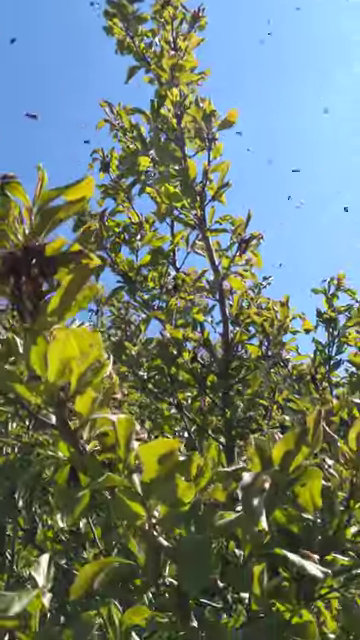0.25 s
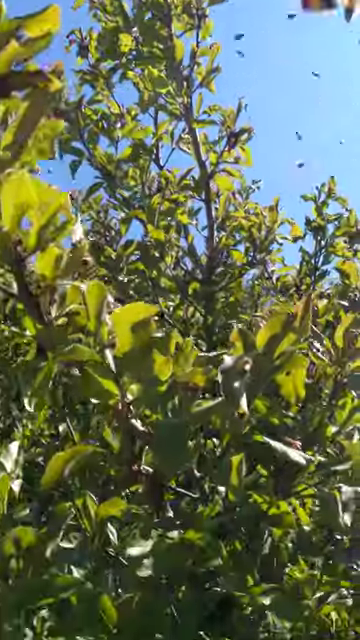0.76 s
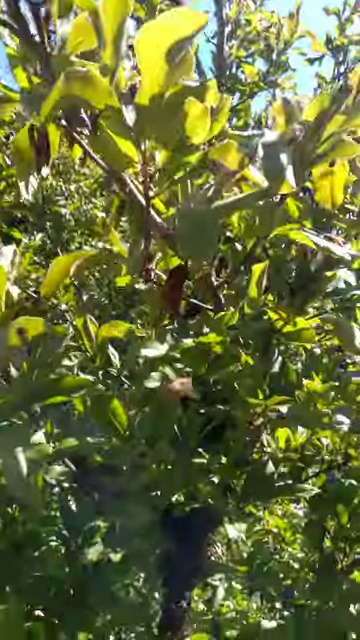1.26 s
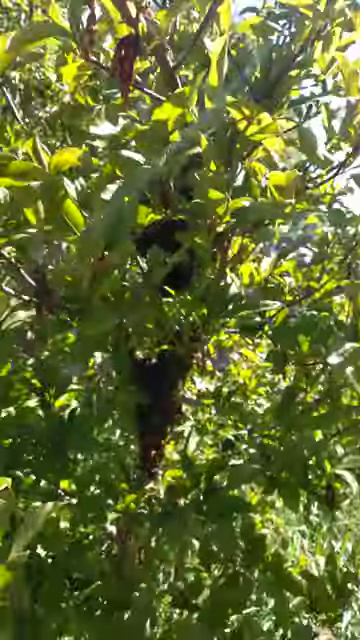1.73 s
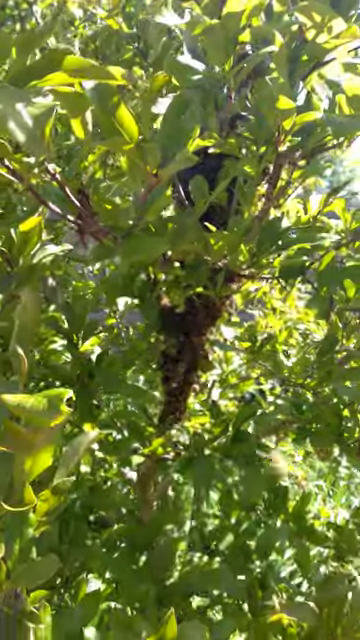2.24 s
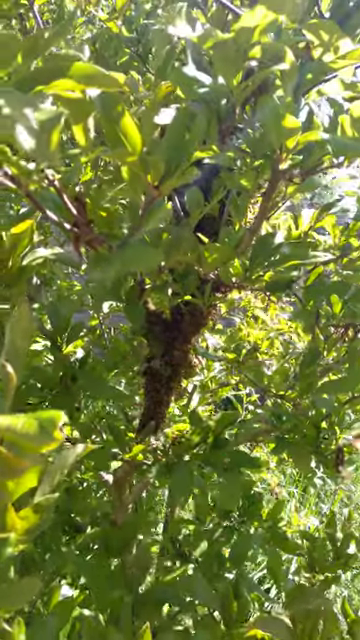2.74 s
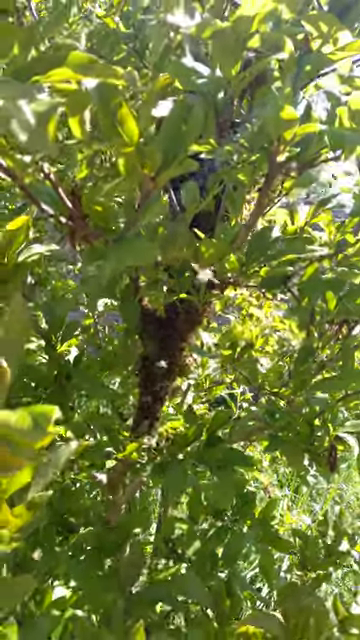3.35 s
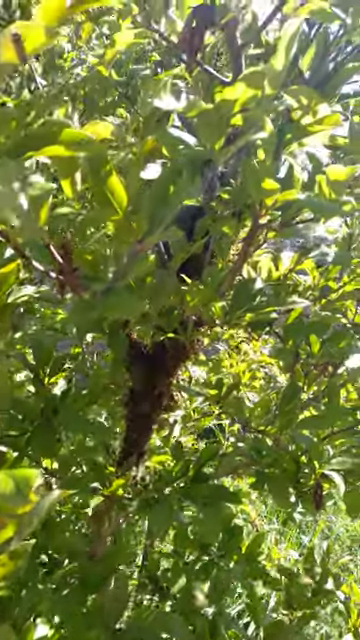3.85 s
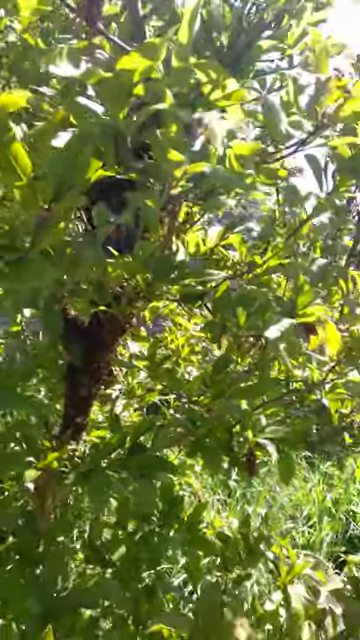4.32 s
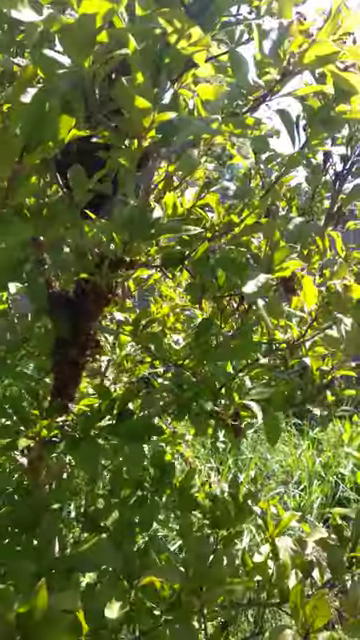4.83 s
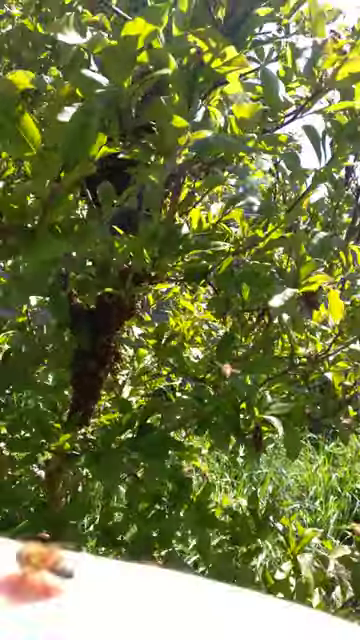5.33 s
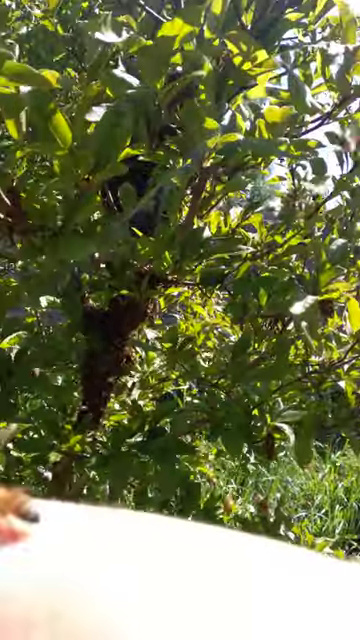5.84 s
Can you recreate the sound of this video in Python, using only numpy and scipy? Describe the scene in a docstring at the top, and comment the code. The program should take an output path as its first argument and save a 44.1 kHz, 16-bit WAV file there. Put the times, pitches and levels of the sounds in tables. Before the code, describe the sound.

Outdoors by a fruit tree, a honeybee swarm makes a continuous wavering hum near 250 hertz. Single bees dart close past the two microphones of a hand-held phone, each a very short swelling buzz that drops in pitch, on either side. Low puffs of air thump on the right, strongest just before one second, and a dull hand knock comes midway. Faint hiss and soft open air lie beneath.

```python
"""A wavering hum runs throughout: a swarm of honeybees circles a fruit tree, heard on a hand-held phone.
Dozens of wavering wingbeats merge into the hum; single bees dart close past the two microphones
with a dropping pitch, and others hover nearby with a bright buzz. Puffs of air (low noise) and
a hand knock (ringing case) thump on the right port, over outdoor air and a soft hiss."""
import sys
import numpy as np
from scipy import signal
from scipy.fft import rfft, irfft, next_fast_len
from scipy.io import wavfile

SR = 44100
rng = np.random.default_rng(int(sys.argv[2]) if len(sys.argv) > 2 else 0)


def store_pcm(level_fs):
    """Save levels as 16-bit WAV."""
    pcm = np.round(np.clip(level_fs, -1, 1) * 32767).astype(np.int16)
    wavfile.write(sys.argv[1], SR, np.atleast_2d(pcm).T)


N = 267951
TIME = np.arange(N) / SR  # seconds
WINGBEAT_HZ, SWARM_DB = 252.93, -61  # middle wingbeat; loudness of the hum (rms)

# The tones inside one wingbeat, also used by the close passes: multiple of the wingbeat, level_db
WINGBEAT_TONES = [(1, 2), (2, -1.5), (3, -9.5), (4, -5.5), (5, -8.5), (6, -11), (7, -12.5), (8, -24.5),
                  (9, -22), (10, -21)]


def swarm(count=48, spread=.058, slow_skew=.016, waver=.038, jitter=.019,
          swell_db=3.0, side_db=3.0, right_dull_db=-2.5):
    """Each bee has its own wingbeat, wavers as it steers, and swells, fades and changes side as it circles."""
    multiple, level_db = np.transpose(WINGBEAT_TONES)
    multiple = np.round(multiple)
    cycle = np.arange(1024) / 1024
    # the right microphone hears the tones above the third more weakly
    ear_db = level_db + np.outer([0, right_dull_db], multiple > 3)
    rank = (np.arange(count) + .5) / count
    vigour = np.log(rank / (1 - rank)) * np.sqrt(3) / np.pi  # a bell-shaped spread over the bees
    out = np.zeros((2, N))
    for v in vigour:
        # laden bees trail off to lower pitches
        own_pitch = spread * v - slow_skew * v * v
        steering = waver * drift(2.5) + jitter * drift(29.62)
        pitch_hz = WINGBEAT_HZ * np.exp(own_pitch + steering)
        beats = np.cumsum(pitch_hz) / SR
        place = (beats % 1 * len(cycle)).astype(int) % len(cycle)
        near_db, lean_db = swell_db * drift(5.2), side_db * drift(3.1)
        for ear, sign in enumerate((1, -1)):
            # scattering by the leaves gives each tone its own phase at each microphone
            turns = np.outer(multiple, cycle) + rng.random((len(multiple), 1))
            stroke = from_db(ear_db[ear]) @ np.sin(2 * np.pi * turns)
            out[ear] += stroke[place] * from_db(near_db + sign * lean_db)
    return from_db(SWARM_DB) * rms_one(out)


# The closest passes: nearest_s, pitch_hz (wingbeat), level_db, left_minus_right_db,
# octave_over_fundamental_db, length_s (a smaller length is a quicker pass)
CLOSEST_PASSES = [ (.272, 244, -50.5, 2, -17, 0.0099), (0.637, 250, -52.5, -16, 20, 0.0093),
                  (.660, 250.2, -55.5, 14, 21, 0.013), (0.933, 242.3, -44.5, -1.5, -17, 0.021),
                  (1.126, 248.7, -48, 1, -20, 0.012), (1.507, 245, -47.5, 2, -15, .012),
                  (2.249, 254, -47.5, -1.5, -8, 0.011), (2.364, 255, -53.5, 7, -25, 0.019),
                  (2.434, 259, -52, -19.5, 14, .011), (2.47, 245.6, -53.5, 20, -7, 0.015),
                  (2.543, 243.4, -44, 4, -27, 0.0088), (2.731, 246.5, -53.5, 20, -5.5, 0.01),
                  (2.912, 234.5, -50, 6, -5.5, 0.028), (2.966, 239, -49, 9, -5.5, .021),
                  (3.025, 247, -44.5, -1, -11, 0.0076), (3.803, 262.8, -51.5, -14, -13, .034),
                  (3.848, 267.4, -46.5, -3, -18, 0.019), (4.162, 261, -49, 0.5, -23, 0.01),
                  (4.72, 257.8, -54.5, 16.5, -7, .023), (5.172, 252, -53.5, -7, 17, 0.024),
                  (5.259, 251, -55, -17.5, -14, 0.03)]


def close_passes(passes, doppler=0.02975, overtone_db=-18.5, port_lag_s=0.00036):
    """The near field of the wings rises and dies within a few beats; the pitch drops as the bee goes by."""
    out = np.zeros((2, N))
    for (s, hz, db, pan_db, octave_db, length), start in zip(passes, rng.random(len(passes))):
        near = slice(*np.searchsorted(TIME, [s - .15, s + .15]))
        along = (TIME[near] - s) / length
        distance = np.sqrt(1 + along ** 2)  # 1 at the nearest point
        pitch_hz = hz * (1 - doppler * along / distance)
        phase = 2 * np.pi * (start + np.cumsum(pitch_hz) / SR)
        # the nearer microphone hears the bee first
        phase = phase + np.pi * hz * port_lag_s * np.sign(pan_db) * np.array([[1], [-1]])
        octave = from_db(octave_db)
        wings = (np.sin(phase) + octave * np.sin(2 * phase)) / np.hypot(1, octave)
        # the overtones carry further than the wings' near field
        buzz = sum(from_db(k_db) * np.sin(round(k) * (phase + k)) for k, k_db in WINGBEAT_TONES[2:])
        passing = wings / distance ** 4 + from_db(overtone_db) * buzz / distance ** 2
        out[:, near] += panned(db, pan_db) * passing
    return out


def stray_passes(count, level_db, side_db, octave_db, length, mean_hz=244, spread=0.06,
                 scatter_db=3.0, colour_db=5.0):
    """Fainter bees dart by at random, one in each equal stretch of time; columns as in CLOSEST_PASSES."""
    when = spaced_times(count)
    pitch, near, side, colour = rng.standard_normal((count, 4)).T
    return np.column_stack([
        when,
        mean_hz * np.exp(spread * pitch),
        level_db + scatter_db * near,
        side_db * np.tanh(side),
        octave_db + colour_db * colour,
        np.full(count, length)])


HOVER_LEAN_DB = 12  # left minus right
# Bees hovering a little way off to the left: middle_s, pitch_hz (wingbeat), level_db, half_length_s
HOVERING_BEES = [(0.249, 235.3, -72.5, 0.35), (1.303, 264, -70.5, .14), (2.471, 258.8, -70, .12),
                 (2.672, 258.8, -65.5, .08), (2.869, 232, -68, .06), (5.552, 267, -69, 0.088)]


def hovering(hovers, count=16, tilt_db=-5.5, waver=.03, doppler=.025, jitter=0.0222):
    """A nearer bee stands out of the hum with a ladder of bending overtones."""
    out = np.zeros((2, N))
    multiple = np.arange(count)[:, None] + 2  # from the octave upward
    gain = from_db(tilt_db * np.log2(np.maximum(multiple, 7) / 7))  # weaker by tilt_db per octave above 7
    for s, hz, db, length in hovers:
        near = abs(TIME - s) < 4 * length
        along = (TIME[near] - s) / length
        distance = np.sqrt(1 + along ** 2)
        wander = (waver * drift(5) + jitter * drift(58.0))[near]
        pitch_hz = hz * (1 - doppler * along / distance + wander)
        for ear, level in enumerate(panned(db, HOVER_LEAN_DB)):
            beats = multiple * np.cumsum(pitch_hz) / SR + rng.random((count, 1))
            buzz = np.sum(gain * np.sin(2 * np.pi * beats), axis=0)
            out[ear, near] += level * rms_one(buzz) / distance ** 3
    return out


def stray_hovers(count=9, level_db=-71.0, spread=.04, length=.08):
    """Fainter hovering bees come and go at random; columns as in HOVERING_BEES."""
    when = spaced_times(count)
    pitches_hz = WINGBEAT_HZ * np.exp(spread * rng.standard_normal(count))
    return [(s, hz, level_db, length) for s, hz in zip(when, pitches_hz)]


AIR_LEAK_DB = -35.0  # how much of the breeze and puffs reaches the left port
# The stronger puffs of air on the right port: middle_s, level_db (rms), half_length_s
AIR_PUFFS = [(0.879, -38.5, .015), (0.915, -40, 0.032), (1.358, -46, 0.0088), (1.409, -41, .021),
             (2.276, -51.5, 0.027), (2.549, -53, .01), (3.007, -61, 0.037), (3.373, -54, .022),
             (3.87, -57, 0.017), (3.921, -42.5, 0.013), (3.992, -58, .027), (4.28, -51.5, 0.028),
             (5.738, -61, .023)]


def puffs():
    """Single puffs buffet the right port as short swells of turbulence; a little reaches the left."""
    out = np.zeros(N)
    for s, db, length in AIR_PUFFS:
        swell = np.exp(-.5 * ((TIME - s) / length) ** 2)
        eddy = swell * eddies(db)
        same_energy = np.sqrt(np.sum(swell ** 2) / np.sum(eddy ** 2))
        out += from_db(db) * eddy * same_energy
    return out * from_db([[AIR_LEAK_DB], [0]])


# The light breeze between the puffs, before its gusts: time_s, level_db (rms)
LIGHT_BREEZE = [(0, -97), (.7, -68), (1.2, -77.5), (2.7, -81.5), (3.75, -76), (4.15, -66), (4.55, -69),
                (4.7, -85), (6.08, -86)]


def breeze(gusty_db=5.0, colour_db=-60):
    """Gusty turbulence buffets the right port; a little reaches the left."""
    steady_db = np.interp(TIME, *np.transpose(LIGHT_BREEZE))
    gusts_db = gusty_db * np.tanh(drift(4.9))
    return eddies(colour_db) * from_db(steady_db + gusts_db) * from_db([[AIR_LEAK_DB], [0]])


# The hand knocks on the case: time_s, level_db (of the blow), softness_hz (low-pass edge)
HAND_KNOCKS = [(3.5092, -7, 271), (3.5280, -10, 267)]
# The ringing tones of the gripped case: pitch_hz, level_db, fade_s (time to fall 60 dB)
CASE_TONES = [(64, -34, 0.15), (103, -5.5, 0.068), (213, -5.5, 0.022), (270, -15.5, 0.022),
              (461, -12, 0.04)]


def knocks(low_hz=52, leak_db=-60.0):
    """Soft blows ring the damped case right beside the right port."""
    blows = np.zeros(N)
    for s, db, soft_hz in HAND_KNOCKS:
        click = np.zeros(N)
        click[round(s * SR)] = from_db(db)
        blows -= cut(click, soft_hz, "low", order=3)
    body = sum(from_db(db) * ring(blows, hz, t60) for hz, db, t60 in CASE_TONES)
    return cut(body, low_hz, "high", order=3) * from_db([[leak_db], [0]])


# Outdoor air and the far edge of the swarm: frequency_hz, level_db (per Hz)
OUTDOOR_AIR = [(20, -128), (35, -116), (55, -103), (95, -103), (130, -111), (200, -100), (320, -107),
               (385, -97), (600, -109), (900, -105), (1500, -107), (3000, -120)]


def open_air():
    """Many distant sounds blur into steady noise, drawn separately for each microphone."""
    return np.array([noise(OUTDOOR_AIR), noise(OUTDOOR_AIR)])


# Self-noise of each microphone: frequency_hz, level_db (per Hz)
LEFT_HISS = [(100, -106), (600, -106), (1400, -104), (2200, -103), (3300, -99), (4700, -100.5),
             (5800, -107), (7100, -95.5), (7900, -96.5), (8750, -91.5), (10000, -97.5), (12000, -110.4),
             (13300, -106.5), (15500, -106.1)]
RIGHT_HISS = [(100, -107.1), (1400, -105.1), (2200, -105.1), (4200, -108.9), (5800, -107.0), (7000, -104.7),
              (8200, -98), (9300, -90.5), (10300, -97.5), (11500, -103.6), (15500, -108.0)]


def microphone_hiss():
    """Each microphone makes its own steady noise with its own colour."""
    return np.array([noise(LEFT_HISS), noise(RIGHT_HISS)])


EDDY_EDGE_HZ, EDDY_REFERENCE_DB, EDDY_OCTAVES_PER_DB = 92, -49, .022  # a harder puff reaches higher


def eddies(db, low_hz=54):
    """Low turbulence of rms 1 whose upper edge rises with its strength."""
    top_hz = EDDY_EDGE_HZ * 2 ** (EDDY_OCTAVES_PER_DB * (db - EDDY_REFERENCE_DB))
    rumble = cut(rng.standard_normal(N), top_hz, "low", order=3)
    return rms_one(cut(rumble, low_hz, "high", order=4))


def noise(spectrum):
    """Steady noise with a given density in dB per Hz."""
    size = next_fast_len(N)
    hz, db = np.transpose(spectrum)
    bin_hz = np.arange(size // 2 + 1) * SR / size
    gain = from_db(np.interp(np.log(bin_hz + 1), np.log(hz), db))
    return irfft(rfft(rng.standard_normal(size)) * gain, size)[:N] * np.sqrt(SR / 2)


def ring(clicks, hz, t60):
    """A unit click sets a fading sine of starting height 1 ringing."""
    r, w = from_db(-60 / (t60 * SR)), 2 * np.pi * hz / SR
    return signal.lfilter([0, np.sin(w)], [1, -2 * r * np.cos(w), r * r], clicks + 1e-18)


def drift(rate):
    """Smooth random wandering of spread 1, changing about rate times a second."""
    r = np.exp(-80 * np.pi * rate / SR)  # worked out at every 40th sample
    slow = signal.lfilter([1], [1, -2 * r, r * r], rng.standard_normal(N // 40 + 2002))
    slow = slow[2000:]  # skip the start, while the filter settles
    return np.interp(np.arange(N) / 40, np.arange(len(slow)), rms_one(slow))


def spaced_times(count):
    """Random times in seconds, one in each equal stretch."""
    return (np.arange(count) + rng.random(count)) / count * N / SR


def panned(db, pan_db):
    """Left and right gain for a level and a left-minus-right difference."""
    return from_db(db + pan_db * np.array([[.5], [-.5]]))


def cut(x, hz, kind, order=2):
    """Butterworth filter."""
    return signal.sosfilt(signal.butter(order, hz, kind, fs=SR, output="sos"), x + 1e-18)


def from_db(db):
    """Decibels to gain."""
    return 10 ** (np.asarray(db) / 20)


def rms_one(x):
    """Scale to rms 1."""
    return x / np.sqrt(np.mean(x ** 2) + 1e-20)


def scene():
    """Bees, moving air, handling, open air and microphone hiss."""
    # many short faint flutters of the octave roughen the hum
    octave_darts = stray_passes(count=220, level_db=-61.5, side_db=7.5, octave_db=11.0, length=.0099)
    # a few stray passes are led by the fundamental
    low_darts = stray_passes(count=12, level_db=-58.0, side_db=11.0, octave_db=-16.0, length=0.012,
                             mean_hz=251, spread=.03, scatter_db=2.0)
    darts = close_passes(np.vstack([CLOSEST_PASSES, octave_darts, low_darts]))
    bees = swarm() + darts + hovering(list(HOVERING_BEES) + stray_hovers())
    return bees + puffs() + breeze() + knocks() + open_air() + microphone_hiss()


def record(dry, cutoff_hz=15720):
    """A steep low-pass filter removes the very top of the treble."""
    low_pass = signal.firwin(801, cutoff_hz, fs=SR)
    return signal.fftconvolve(dry, low_pass[None], "same", axes=1)


dry = scene()
out = record(dry)
store_pcm(out)
```